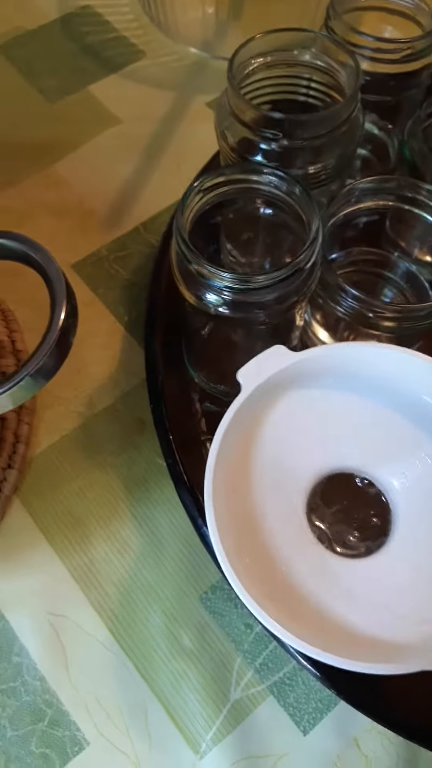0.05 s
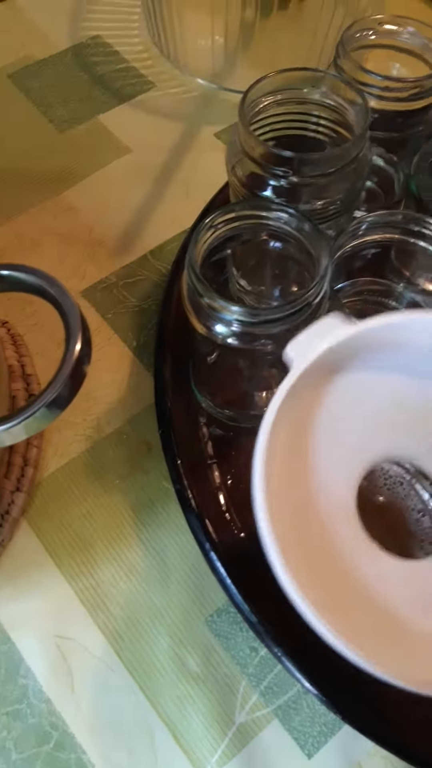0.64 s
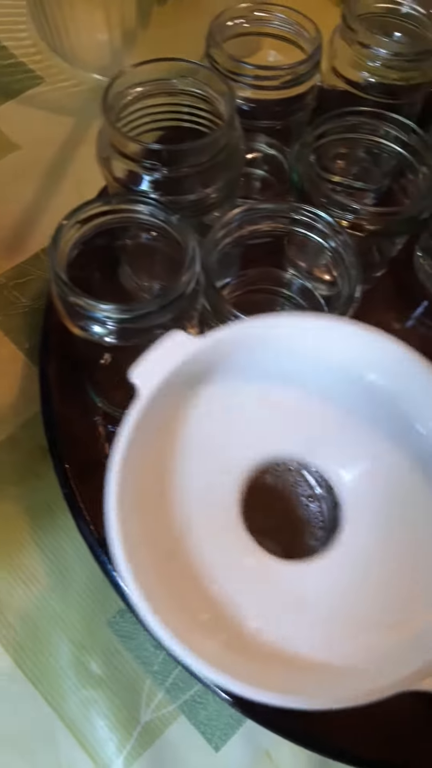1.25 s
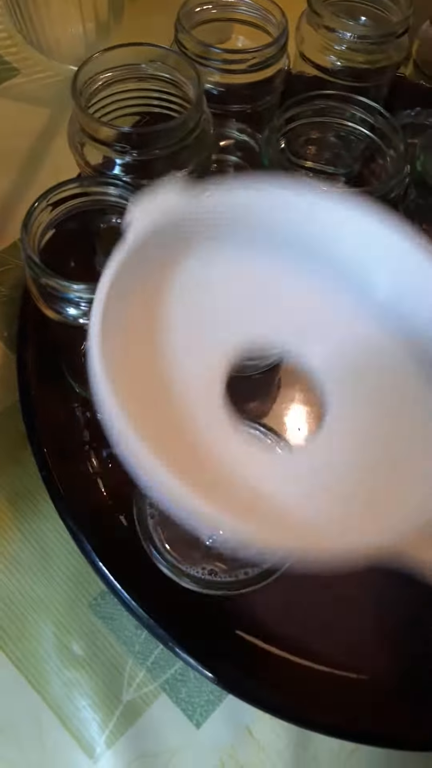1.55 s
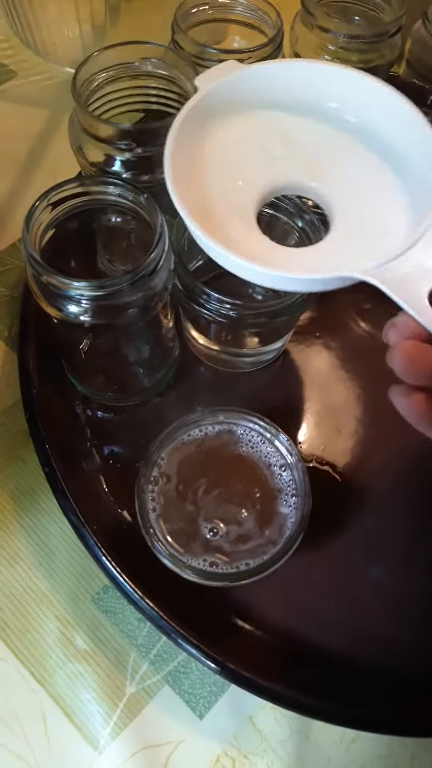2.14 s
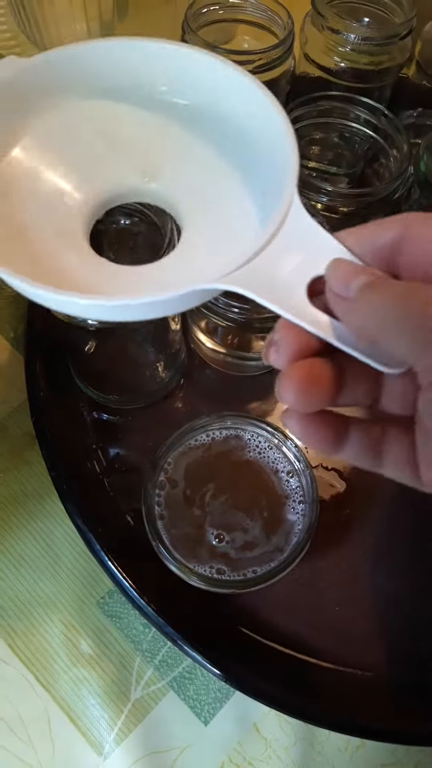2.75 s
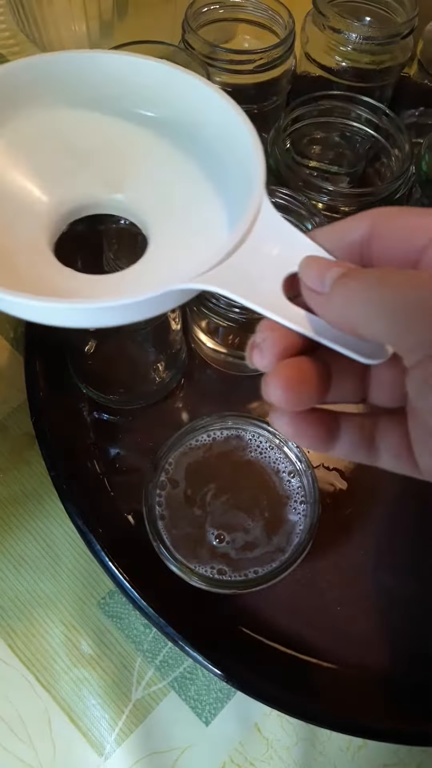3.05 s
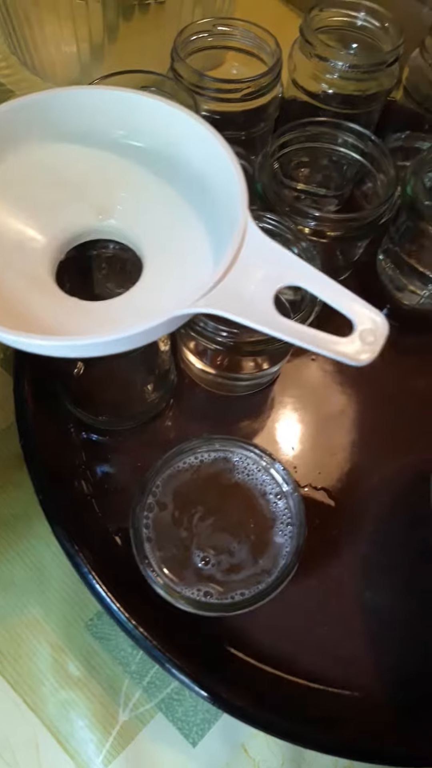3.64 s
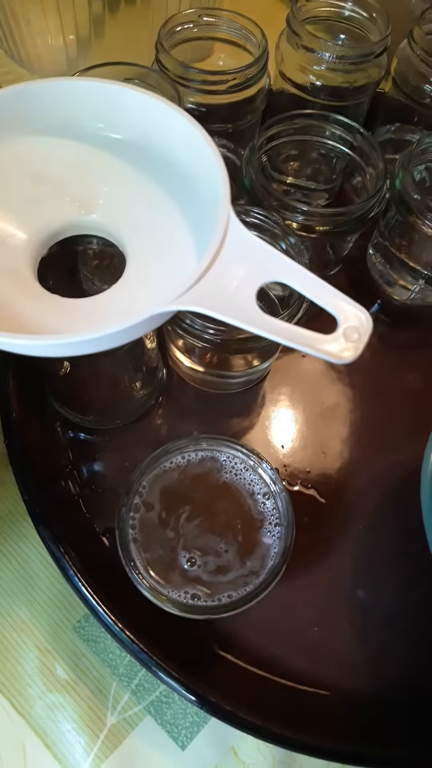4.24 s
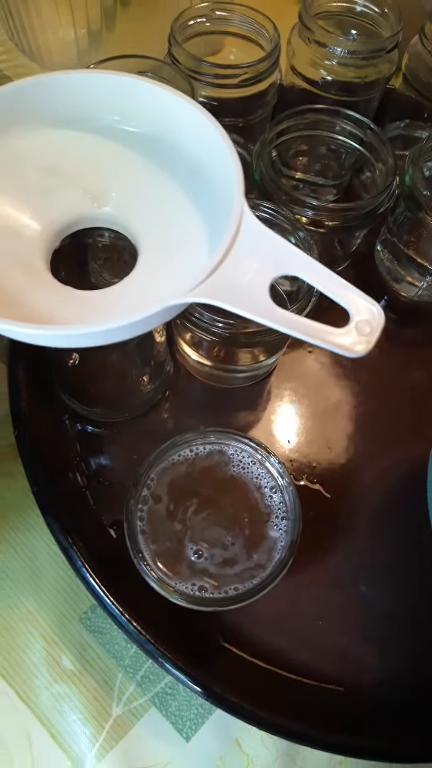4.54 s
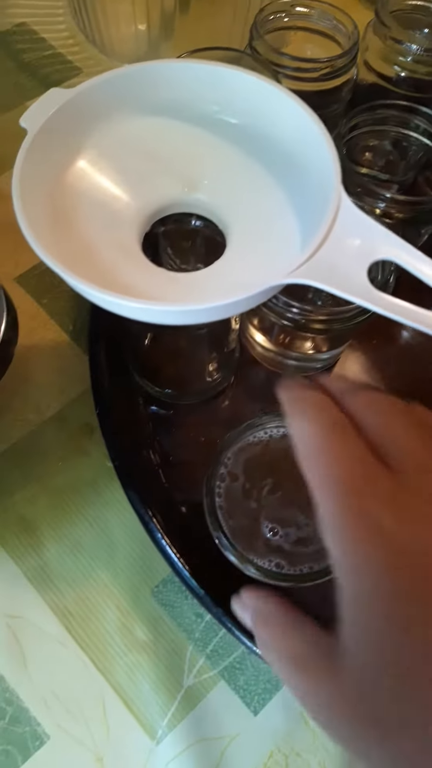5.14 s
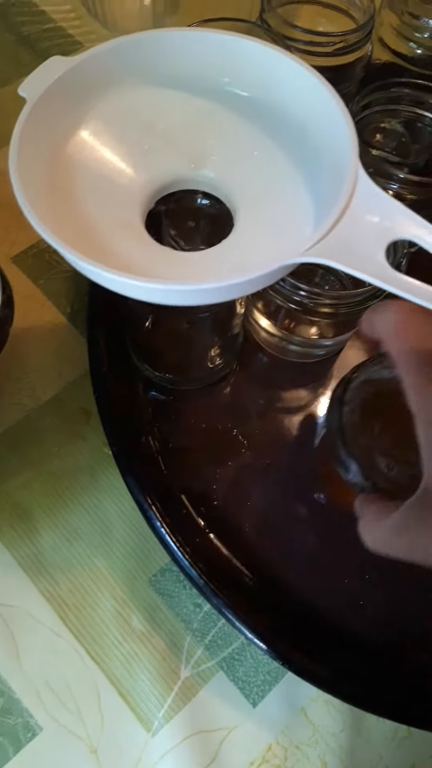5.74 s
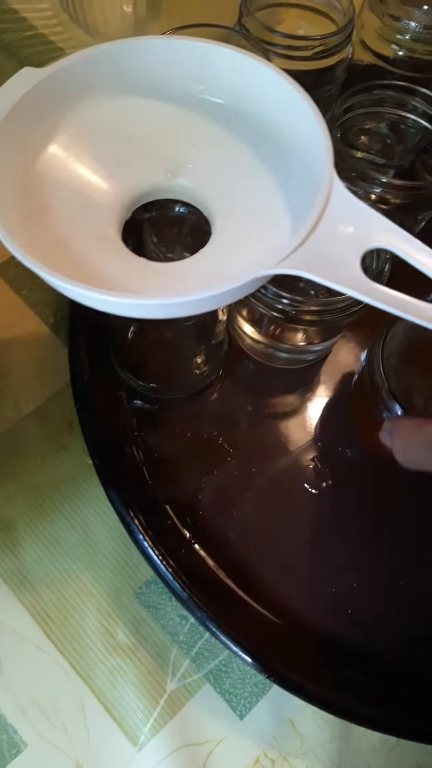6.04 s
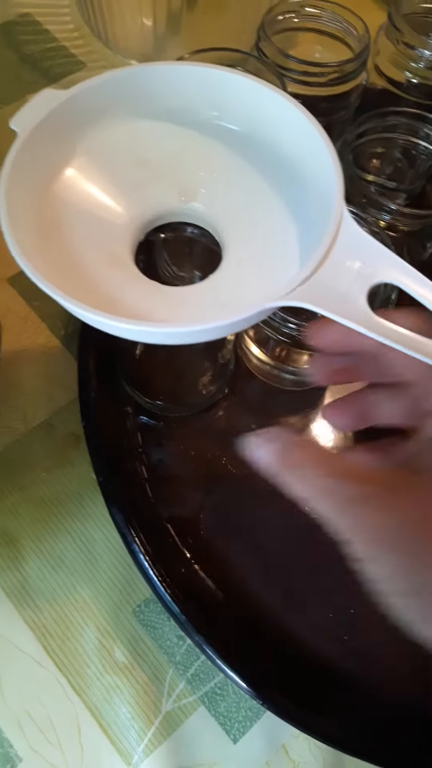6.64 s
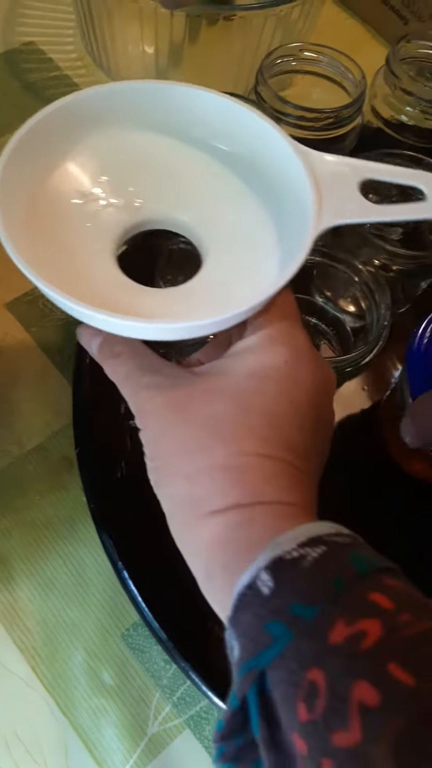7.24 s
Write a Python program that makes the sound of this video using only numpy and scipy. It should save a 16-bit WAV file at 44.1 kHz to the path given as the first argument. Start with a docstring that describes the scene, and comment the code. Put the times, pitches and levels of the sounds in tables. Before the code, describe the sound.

Heard close up in a small, quiet kitchen, light plastic clicks and rubbing from a funnel give way to glass jars ringing, trembling and thudding on a tray. A short pause holds a soft brush and a tiny pop. Then a filled jar clinks and slides over the tray with a gritty rumble, and empty jars knock together in a last burst of sharp clinks, each with a short room tail.

```python
"""A small kitchen: a plastic funnel is worked loose from a filled glass jar and set on the next one,
among empty jars on a tray. The funnel ticks, judders and rubs, struck glass rings and sets its
neighbours rattling, and the jars thud on the tray. A sleeve brushes by and catches, something tiny
pops; the full jar is gripped and scrapes away over the tray, then an empty one bumps its neighbours.
The sound is close, with a short room tail and a faint hiss; a limiter holds down the loudest clinks."""
import sys
import numpy as np
from scipy import signal
from scipy.fft import rfft, irfft, next_fast_len
from scipy.io import wavfile
from scipy.ndimage import uniform_filter1d, minimum_filter1d

SR = 44100
rng = np.random.default_rng(int(sys.argv[2]) if len(sys.argv) > 2 else 0)


def master_out(mix):
    """Clip the mix to full scale and print it as 16-bit PCM to the path in sys.argv[1]."""
    frames = np.transpose(np.atleast_2d(mix))
    ceiling = np.clip(frames, -1, 1)
    pcm = np.round(ceiling * 32767).astype(np.int16)
    wavfile.write(sys.argv[1], SR, pcm)


N = 326777
TIME = np.arange(N) / SR

# jars bump the tray: (time [s], level [dB], resonance [Hz], swell [s], "alone" or in the "crowd")
KNOCKS = [(0.072, -37.5, 294, 0.036, "alone"), (1.074, -26, 1080, 0.021, "alone"),
          (1.634, -40.5, 567, 0.019, "alone"), (1.873, -30, 730, 0.0035, "crowd"),
          (1.933, -25, 980, 0.0096, "alone"), (2.01, -30.5, 694, 0.017, "crowd"),
          (2.094, -26.5, 686, 0.045, "alone"), (2.153, -28, 720, 0.0094, "crowd"),
          (2.291, -29.5, 635, 0.011, "alone"), (2.374, -33, 650, 0.0038, "crowd"),
          (2.725, -26.5, 700, 0.008, "crowd"), (2.944, -36.5, 616, 0.022, "crowd"),
          (3.124, -27, 1360, 0.0016, "alone"), (3.14, -16, 1300, 0.014, "crowd"),
          (4.259, -56.5, 476, 0.01, "crowd"), (4.75, -52, 470, 0.0061, "alone"),
          (5.103, -31, 651, 0.019, "alone"), (5.181, -34.5, 1980, 0.062, "alone"),
          (5.857, -40, 171, 0.0071, "alone"), (6.32, -51, 796, 0.0071, "alone"),
          (6.839, -27, 740, 0.023, "crowd"), (7.104, -20.5, 564, 0.027, "alone")]
# low resonances of the room and higher ones of the tray: (centre [Hz], width [Hz], lift [dB])
ROOM_TRAY_MODES = [(120, 10, 7), (152, 10, 6), (197, 14, 7.5), (300, 18, 4.5), (380, 20, 3), (458, 25, 4),
                   (535, 30, 9), (660, 55, 7.5), (790, 50, 6.5), (1080, 130, 4), (1420, 160, 5)]
# spectrum of a dry click: (frequency [Hz], level [dB])
TICK_COLOUR = [(100, -21.5), (300, -5), (800, -2), (1500, -3.5), (4000, 3.5), (6000, -3.5), (9500, 0),
               (12000, -7), (16000, -12)]


def clinks(crack_db=-9.0, crack_t60=0.08, bloom_s=0.00024, answer_db=-5.5, answer_t60=0.12):
    """A struck jar rings in its modes; the contact cracks, and touching jars answer at nearby pitches."""
    # ringing modes of the jars; the dragged one also sets the tray ringing low:
    # (frequency [Hz], level [dB], t60 [s])
    jars = { "squat": [(3354, 0, .145), (5373, -17, .15), (5943, -8, .12), (6034, -8, .125),
            (6944, -11, .13), (7790, -19, .12), (8895, -8, .11), (9055, -11, .11), (10840, -14, .11),
            (12680, -15, .12)], "wide": [(2890, -8, .17), (3059, 0, .18), (3212, 0, .17), (5819, -21, .3),
            (6942, -7, .13), (7542, -14, .18), (7849, -16, .16), (8527, -12, .15), (9458, -16, .18),
            (10000, -14, .14), (12110, -13, .14)], "tall": [(2813, -10, .24), (2886, -8, .16),
            (3212, -8, .18), (3340, 0, .15), (6030, -6, .12), (6993, -6, .1), (7790, -12, .11),
            (8892, -5, .1), (9120, -3, .125), (12690, -16, .1)], "thick": [(3025, -4, .22), (4614, 0, .16),
            (4655, -3, .1), (4822, 1, .07), (5750, -12, .08), (6934, -14, .2), (7610, -13, .17),
            (9254, -18, .15), (11000, -15, .1)], "small": [(3009, -3, .2), (4822, -10, .28), (5366, 0, .11),
            (6500, -24, .15), (7180, -22, .15), (8950, -20, .15)], "full": [(640, -5, .1), (1814, 1, .05),
            (5463, 1, .1), (7780, -1, .12), (8136, -7, .06), (9199, -8, .05), (9790, -8, .05)],
            "held": [(780, -11, .08), (1900, -4, .035), (3480, 0, .04), (3760, -9, .08), (4300, -9, .04)],
            "dragged": [(505, 7, .13), (2821, -10, .16), (3806, -13, .14), (4969, -12, .11),
            (5870, -12, .1), (9200, -13, .1)], "narrow": [(2520, -13, .08), (3550, -13, .08),
            (4390, 0, .08), (4570, -5, .12), (7790, -13, .1)], }
    # strikes on glass: (time [s], jar, level [dB], brightness [dB/octave])
    strikes = [(1.873, "small", -28, 1.5), (1.9858, "thick", -17.5, -4), (2.0125, "thick", -20.5, 4),
               (2.1532, "squat", -25, -5), (2.3258, "squat", -14.5, -3), (2.594, "narrow", -27, 0),
               (3.1389, "squat", -7.5, 0.5), (3.1983, "squat", -16, 2), (5.0846, "full", -20.5, 0),
               (5.103, "narrow", -17, -5), (5.1497, "held", -15, 0.5), (5.1824, "held", -20, 6),
               (5.754, "dragged", -29, 0), (6.8391, "wide", -13.5, 1), (7.1019, "tall", -4.5, 1.5),
               (7.104, "wide", -18.5, 3), (7.2158, "small", -18, -3), (7.2973, "small", -26.5, -7),
               (7.3811, "small", -32, 7)]
    out, t = np.zeros(N), TIME[:SR // 2]
    for s, jar, level_db, tilt in strikes:
        hz, mode_db, t60 = np.array(jars[jar]).T[:, :, None]
        mode_db = mode_db + tilt * np.log2(hz / 3500) + rng.standard_normal(hz.shape)
        ring = ringing(t, hz, from_db(mode_db), t60)
        nearby = [(f, 71.0, db) for f, db in zip(hz, mode_db)]  # bands 71 Hz wide
        answer = from_db(answer_db) * dense_modes(t, lambda f: peaks_db(f, nearby)) * fade(t, answer_t60)
        crack = from_db(crack_db) * dense_modes(t, lambda f: at_hz(TICK_COLOUR, f)) * fade(t, crack_t60)
        add(out, s, from_db(level_db) * ((ring + answer) * rise(t, bloom_s) + crack))
    return out


def ticks(gain_db=-7.0, snap_t60=0.019, body_t60=0.079, contact_s=0.00033, shelf_hz=5500):
    """Small dry clicks and catches: a damped snap and a duller tail, some with a hollow ring."""
    # clicks and catches: (time [s], level [dB], resonance [Hz], treble [dB], hollow ring [dB])
    clicks = [(0.019, -27, 5160, -18, -17), (0.033, -22, 3460, -21, -16), (0.185, -9.5, 3770, -18, -7),
              (0.255, -17, 3540, -27, -16), (0.436, -38.5, 4200, -20, -11),
              (0.4992, -19.5, 2340, -11.5, -22), (0.565, -22.5, 2580, -15, -11),
              (0.7202, -33.5, 2260, -17, -10), (0.7932, -12, 2350, -26, -15), (0.891, -40, 1300, 0, -12),
              (0.9425, -37.5, 5000, -4, -16), (0.976, -15, 8600, -4, -7.5), (0.9937, -18, 4240, -13, -21),
              (1.2464, -39, 2760, -24, -8), (1.5725, -22.5, 1970, -7.5, -19), (1.6338, -16.5, 4200, -5, -3),
              (1.724, -25.5, 2810, -13, -13), (1.7464, -18, 2100, -15, -12),
              (1.8803, -8.5, 5370, 30, -11.5), (2.013, -7.5, 4990, -27, -25),
              (2.1088, -10.5, 1360, -11, -18), (2.153, -14, 3070, -3, -22), (2.2641, -8.5, 1910, -15.5, -5),
              (2.2928, -12.5, 4660, -3, -8), (2.375, -6, 8600, -11.5, -23), (2.4933, -24.5, 2200, -20, -20),
              (2.5942, -4, 4530, -15.5, -8.5), (3.158, -3, 9000, -12, -30), (3.493, -39, 7260, 3, -25),
              (3.5646, -35, 7000, -5.5, -26), (3.675, -36, 6000, -14, -20), (3.724, -26, 9000, 29, -13),
              (4.7295, -32.5, 9130, 5, -30), (4.7637, -22, 11500, 16, -25), (4.7775, -32.5, 2630, -9, -5.5),
              (5.1458, -16, 7940, 2, -29.5), (5.1499, -4, 3120, -13, -30), (5.477, -14, 9500, -1, -31),
              (5.516, -15, 4200, -9, -28), (5.586, -21, 9060, 7, -30), (5.6314, -21, 5800, 5.5, -31),
              (5.906, -28, 1280, -24, -30), (6.0196, -23, 5500, 0, -28), (6.188, -19.5, 5760, -0.5, -27),
              (6.8406, -9, 4200, -15.5, -21.5), (7.276, -27, 9000, -16, -30), (7.381, -13, 8250, -5.5, -30)]
    # hollow resonances that colour every click: (centre [Hz], width [Hz], lift [dB])
    hollow_modes = [(1360, 290, 5.5), (1740, 360, 7), (2200, 87, 1.5), (3560, 750, -3), (4200, 310, 0)]
    out, t = np.zeros(N), TIME[:SR // 6]
    dull = signal.butter(1, 7000, fs=SR)
    for s, level_db, centre_hz, treble_db, ring_db in clicks + judders():
        def colour(f):
            spot = 7.0 * hump(f, centre_hz, octaves=0.22)
            shelf = (treble_db + 13.5) * f ** 4 / (f ** 4 + shelf_hz ** 4)
            return at_hz(TICK_COLOUR, f) + body_lift(f, hollow_modes) + spot + shelf
        snap = dense_modes(t, colour) * fade(t, snap_t60)
        body = signal.lfilter(*dull, dense_modes(t, colour)) * fade(t, body_t60)
        body_db = -13.5 - 0.4 * level_db  # softer ticks have more tail for their snap
        sound = snap + from_db(body_db) * body + from_db(ring_db) * hollow_ring(t, centre_hz)
        add(out, s, from_db(level_db + gain_db) * sound * rise(t, contact_s))
    return out


def judders(wander_octaves=0.17):
    """The stuck funnel or sliding jar slips in quick, even ticks, each on a slightly different spot."""
    # runs of slips: (time [s], slips, gap [s], first level [dB], growth [dB/slip], resonance [Hz],
    # treble [dB], hollow ring [dB])
    runs = [(0.067, 4, 0.012, -15, 1, 3300, -8, -24), (1.065, 3, 0.0091, -16.5, 5.5, 3100, -15, -8.5),
            (5.085, 3, 0.0036, -7, -1, 9000, 9, -28), (5.751, 4, 0.0049, -15.5, -0.2, 3000, -11, -25.5)]
    clicks = []
    for s, slips, gap, first_db, growth_db, hz, treble_db, ring_db in runs:
        for k in range(slips):
            spot_hz = hz * 2 ** (wander_octaves * rng.standard_normal())
            clicks.append((s + k * gap, first_db + k * growth_db, spot_hz, treble_db, ring_db))
    return clicks


def hollow_ring(t, centre_hz, favour_db=14.0, scatter_db=3.5):
    """A short, plastic-sounding ring that favours the modes near the click's resonance."""
    # modes of the hollow ring: (frequency [Hz], level [dB], t60 [s])
    ring_modes = [(1300, -11, .07), (1566, -2.5, 0.17), (2180, -4, 0.061), (2354, -3, 0.097),
                  (2810, -7, .08), (3300, -6, 0.057), (3880, -6.5, 0.078), (4030, -5.5, 0.078),
                  (4240, -1, 0.044), (4700, -10.5, 0.042), (7360, -13, 0.063), (9000, -4, 0.031)]
    hz, mode_db, t60 = np.array(ring_modes).T[:, :, None]
    spot_db = favour_db * hump(hz, centre_hz, octaves=0.69)
    gains = from_db(mode_db + spot_db + scatter_db * rng.standard_normal(hz.shape))
    return ringing(t, hz, gains, t60) / np.linalg.norm(gains)


def knocks(tray_t60=0.17, resonance_db=8.5, start_gain=0.6):
    """A low thud on the tray swells briefly, then dies away."""
    # spectrum of the knocked tray: (frequency [Hz], level [dB])
    tray_colour = [(40, -22), (80, -7), (130, -1), (260, -3), (500, 3), (800, -2.5), (1400, -5.5),
                   (2200, -11), (4000, -11.5), (8000, -16), (16000, -33)]
    out, t = np.zeros(N), TIME[:SR // 3]
    for s, level_db, centre_hz, swell_s, _ in KNOCKS:
        def colour(f):
            # high-pitched knocks are hard and carry less bass
            hardness = np.log2(centre_hz / 550) * np.log2(np.clip(f, 100, 2000) / 550)
            spot = resonance_db * hump(f, centre_hz, octaves=0.18)
            return at_hz(tray_colour, f) + body_lift(f, ROOM_TRAY_MODES) + hardness + spot
        envelope = np.interp(t, [0, swell_s], [start_gain, 1]) * hold(t, swell_s, tray_t60)
        add(out, s, from_db(level_db) * dense_modes(t, colour) * envelope)
    return out


def rattles(tremble_db=-14.5, tremble_s=0.055, onset_s=0.0015, die_t60=0.015):
    """Knocked or jostled, the empty jars tremble together and ring from a flurry of tiny touches."""
    # the hand or the rocking funnel jostles the jars: (time [s], level [dB])
    jostles = [(2.021, -33.5), (2.4, -45), (2.523, -45), (2.752, -47), (3, -53), (3.239, -41), (3.396, -53),
               (3.559, -50.5), (3.762, -47), (3.899, -60), (4.27, -72), (6.8, -59), (6.839, -23.5)]
    # resonances of the crowd of empty jars: (centre [Hz], width [Hz], level [dB])
    crowd_modes = [(2885, 16, -6), (2920, 16, -5), (2975, 22, -9), (3060, 25, -10), (3214, 18, -8),
                   (3330, 80, -8), (3850, 450, -9), (4613, 16, -16), (5798, 30, -12), (7574, 25, -13),
                   (8064, 25, -16), (9292, 35, -18), (9458, 30, -17), (9895, 22, -17), (12516, 30, -20)]
    after_knocks = [(s + swell_s, db + tremble_db)
                    for s, db, _, swell_s, place in KNOCKS if place == "crowd"]
    out, shaking, t = np.zeros(N), np.zeros(N), TIME[:SR // 2]
    for s, level_db in jostles + after_knocks:
        add(shaking, s, from_db(level_db) * rise(t, onset_s) * hold(t, tremble_s, die_t60))
    touches = shaking * rms_one(grains(per_s=500, spread_db=2.2))
    for hz, width, mode_db in crowd_modes:
        ring = signal.lfilter(*signal.iirpeak(hz, hz / width, fs=SR), touches + 1e-18)
        out += from_db(mode_db) * np.sqrt(SR / (np.pi * width)) * ring  # power independent of width
    return filtered(out, 6, 2600, "high")


def sliding(rumble_db=-4.0, grit_db=-0.5, judder_db=2.5, patchy_db=3.0, release_t60=0.081):
    """The full jar is pushed over the tray: dense slips rumble in the tray and scratch in the treble."""
    # pushes: (time [s], length [s], level [dB], easing off [dB/s], swell [s])
    pushes = [(5.386, 0.35, -32, 24, 0.1), (5.70, 0.29, -29.5, 55.5, 0.059), (5.975, 0.29, -40.5, 8, 0.054)]
    # spectrum of glass scraping the tray: (frequency [Hz], level [dB])
    slide_colour = [(60, -24), (120, -3.5), (250, -1), (400, 2.5), (520, -0.5), (900, -2.5), (1300, -8),
                    (2500, -9), (4000, -8), (7400, -14), (9200, -9.5), (11000, -15.5), (16000, -19)]
    # resonances that scraping wakes in the jar: (centre [Hz], width [Hz], lift [dB])
    jar_modes = [(586, 35, 7), (628, 22, 7), (1140, 54, 8.5), (2820, 45, 4)]
    slips = from_db(judder_db * wander(per_s=130.5)) * grains(per_s=3500, spread_db=3.2)
    # bands come and go as the contact moves
    edges = np.geomspace(90, 17000, 24)
    patchy = sum((-1) ** k * from_db(patchy_db * wander(per_s=28.03)) * filtered(slips, 2, band, "band")
                 for k, band in enumerate(zip(edges, edges[1:])))
    modes = ROOM_TRAY_MODES + jar_modes
    scrape = coloured(patchy, lambda f: at_hz(slide_colour, f) + body_lift(f, modes))
    rumble = from_db(rumble_db) * rms_one(filtered(scrape, 3, 1500, "low"))
    grit = from_db(grit_db) * rms_one(filtered(scrape, 3, 1500, "high"))
    effort = np.zeros(N)
    for s, length, level_db, easing, swell_s in pushes:
        eased_db = level_db - easing * np.clip(TIME - s, 0, length)
        effort += from_db(eased_db) * stroke(s, length, swell_s, release_t60)
    return effort * (rumble + grit)


def rubbing(uneven_db=3.5, attack_s=0.0078, release_t60=0.33):
    """Funnel, jars and tray rub under the hand: sparse small slips in uneven spurts."""
    # hand strokes: (time [s], length [s], level [dB])
    rubs = [(0.0, 0.22, -43), (0.446, .14, -46.5), (0.697, 0.31, -50), (1.066, 0.24, -50),
            (1.715, 0.056, -44.5), (1.896, 0.77, -45), (2.732, 0.56, -50), (3.35, 0.55, -53),
            (3.97, 0.32, -67.5), (6.789, 0.21, -55), (7.244, 0.27, -47.5)]
    # spectrum of the rubbing: (frequency [Hz], level [dB])
    rub_colour = [(50, -18.5), (120, 2), (300, 2.5), (650, -2), (1400, -7.5), (2300, -18.5), (3500, -8.5),
                  (5500, -25), (9500, -24), (16000, -42.5)]
    slips = from_db(uneven_db * wander(per_s=45.3)) * grains(per_s=1000, spread_db=2.5)
    effort = sum(from_db(db) * stroke(s, length, attack_s, release_t60) for s, length, db in rubs)
    return effort * coloured(slips, lambda f: at_hz(rub_colour, f) + body_lift(f, ROOM_TRAY_MODES))


def brushing(s=4.49, length_s=0.259, start_db=-63.0, growth_db_per_s=81.0):
    """Something light, probably a sleeve, brushes along the table, swelling until it catches."""
    # spectrum of the brushing fibres: (frequency [Hz], level [dB])
    brush_colour = [(300, -24), (1400, -19), (2200, -8.5), (6500, -5.5), (9200, -2.5), (16000, -12)]
    fibres = coloured(grains(per_s=6000, spread_db=3.8), lambda f: at_hz(brush_colour, f))
    swell = from_db(start_db + growth_db_per_s * np.clip(TIME - s, 0, length_s))
    return fibres * swell * stroke(s, length_s, attack_s=0.08, release_t60=0.146)


def bubble(s=4.884, level_db=-26.5, hz=8600.0, t60=0.012, onset_s=0.0011):
    """One tiny, high pop, perhaps from the foam on the filled jar."""
    out, t = np.zeros(N), TIME[:SR // 20]
    add(out, s, from_db(level_db) * np.sin(2 * np.pi * hz * t) * rise(t, onset_s) * fade(t, t60))
    return out


def kitchen(x, wet_db=-10.0, first_wall_s=0.00079):
    """Diffuse wall reflections, each band dying at its own rate."""
    # reverberation: (frequency [Hz], t60 [s], level [dB])
    room = [(120, 0.62, 2), (490, 0.27, 4.5), (3000, 0.33, 0), (6400, 0.27, -7), (9500, 0.34, -1.5),
            (14900, 0.12, -1.5)]
    decays, levels = np.array(room)[:, :2], np.array(room)[:, ::2]
    t, edges = TIME[:2 * SR // 3], np.geomspace(60, 17000, 12)
    response = np.zeros(len(t))
    for low, high in zip(edges, edges[1:]):
        hz = np.sqrt(low * high)
        band = filtered(rng.standard_normal(len(t)), 2, [low, high], "band")
        response += band * fade(t, at_hz(decays, hz)) * from_db(at_hz(levels, hz))
    response *= t > first_wall_s
    return from_db(wet_db) * signal.fftconvolve(x, response / np.linalg.norm(response))[:N]


def room_tone(level_db=-65.5):
    """Still air with a faint, steady hiss."""
    # spectrum of the quiet room: (frequency [Hz], level [dB])
    air_colour = [(18, -36), (30, -7), (145, 4), (584, -11), (988, -14), (1190, -17), (2300, -17),
                  (3490, -14), (5040, -11), (6300, -15), (7870, -7), (9100, -2), (10500, -8), (13300, -12),
                  (16000, -19)]
    return from_db(level_db) * dense_modes(TIME, lambda f: at_hz(air_colour, f))


def ringing(t, hz, gains, t60):
    """Decaying sine modes of random phase, summed."""
    return np.sum(gains * fade(t, t60) * np.sin(2 * np.pi * (hz * t + rng.random(hz.shape))), axis=0)


def dense_modes(t, db_at):
    """Countless modes of random phase under one spectrum."""
    phases = np.exp(2j * np.pi * rng.random(len(t) // 2 + 1))
    return coloured(irfft(phases, len(t)), db_at)


def grains(per_s, spread_db):
    """Random micro-slips of uneven size."""
    sizes = from_db(spread_db * np.minimum(rng.exponential(1, N), 4)) * rng.choice([-1, 1], N)
    return sizes * (rng.random(N) < per_s / SR)


def wander(per_s):
    """A random level that glides to a new value so many times a second."""
    values = rng.standard_normal(SR // 10)
    return np.interp(TIME * per_s, np.arange(len(values)), values)


def stroke(s, length, attack_s, release_t60):
    """Envelope of a hand movement: swell, hold, die away."""
    t = TIME - s
    return np.clip(t / attack_s, 0, 1) ** 2 * hold(t, length, release_t60)


def rise(t, onset_s):
    """Exponential attack."""
    return 1 - np.exp(-t / onset_s)


def hold(t, length, t60):
    """Full level for a while, then a decay."""
    return fade(np.maximum(t - length, 0), t60)


def fade(t, t60):
    """Exponential decay, 60 dB down at t60."""
    return np.exp(-np.log(1000) * t / t60)


def coloured(x, db_at):
    """Shape x with an EQ curve (dB as a function of Hz), at unit power."""
    size = next_fast_len(len(x))
    gains = from_db(db_at(np.fft.rfftfreq(size, 1 / SR)))
    return rms_one(irfft(rfft(x, size) * gains, size)[:len(x)])


def filtered(x, order, hz, kind):
    """Low-, high- or band-pass filter with a flat passband."""
    return signal.sosfilt(signal.butter(order, hz, kind, fs=SR, output="sos"), x)


def at_hz(points, hz):
    """Read a curve on a log-frequency axis."""
    f, value = np.transpose(points)
    return np.interp(np.log(hz + 1e-9), np.log(f), value)


def hump(hz, centre_hz, octaves):
    """A resonance bump of height 1."""
    return 1 / (1 + (np.log2((hz + 1) / centre_hz) / octaves) ** 2)


def body_lift(hz, modes):
    """Lift in dB that resonances give to whatever excites them."""
    return sum(lift_db / (1 + (2 * (hz - centre) / width) ** 2) for centre, width, lift_db in modes)


def peaks_db(hz, peaks):
    """Spectrum in dB of parallel resonances."""
    power = sum(from_db(2 * peak_db) / (1 + ((hz ** 2 - centre ** 2) / (width * hz + 1)) ** 2)
                for centre, width, peak_db in peaks)
    return 10 * np.log10(power + 1e-12)


def from_db(db):
    """Decibels to gain."""
    return 10 ** (np.asarray(db) / 20)


def rms_one(x):
    """Scale to unit power."""
    return x / np.sqrt(np.mean(x ** 2) + 1e-20)


def add(track, s, sound):
    """Mix a sound in at time s."""
    start = round(s * SR)
    track[start:start + len(sound)] += sound[:N - start]


def scene():
    """Contacts and friction in the kitchen, over quiet room tone; mono."""
    near = clinks() + rattles() + ticks() + knocks() + rubbing() + sliding() + brushing() + bubble()
    near = filtered(near, 4, 68, "high")  # the near sounds carry no deep bass
    return (near + kitchen(near) + room_tone())[None]


def record(dry, ceiling=0.99, release_db_per_s=494.0, cutoff_hz=16100):
    """A fast limiter holds the loudest clinks down; a steep low-pass cuts the very top."""
    over_db = 20 * np.log10(np.maximum(np.abs(dry[0]) / ceiling, 1))
    held_db = np.maximum.accumulate(over_db + release_db_per_s * TIME) - release_db_per_s * TIME
    gain_db = uniform_filter1d(minimum_filter1d(-held_db, size=45), size=45)  # 1 ms look-ahead
    high_cut = signal.ellip(10, .1, 80, cutoff_hz, fs=SR, output="sos")
    return signal.sosfilt(high_cut, dry * from_db(gain_db))


dry = scene()
out = record(dry)
master_out(out)
```